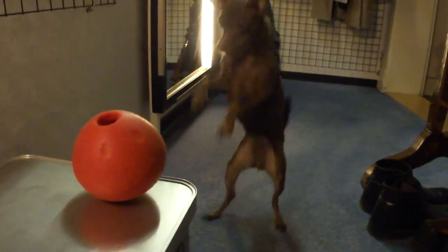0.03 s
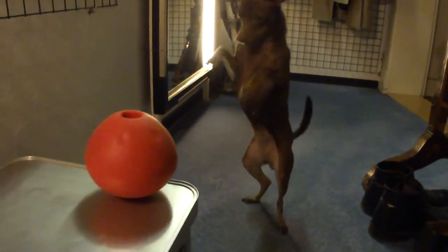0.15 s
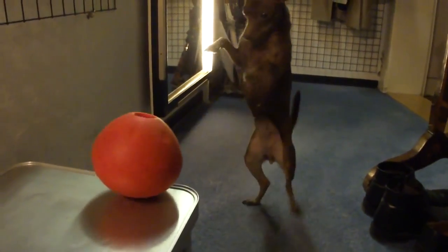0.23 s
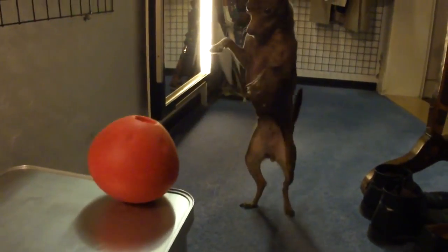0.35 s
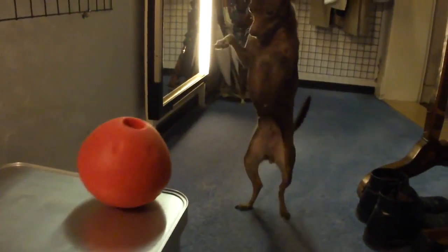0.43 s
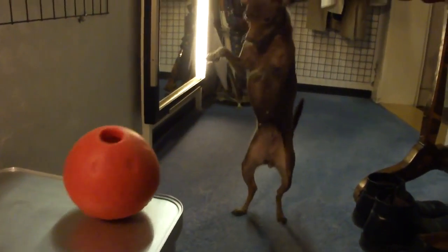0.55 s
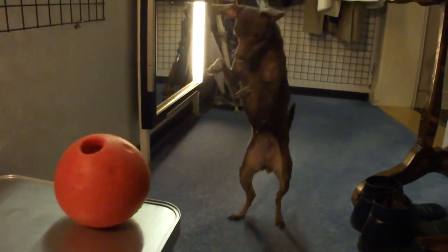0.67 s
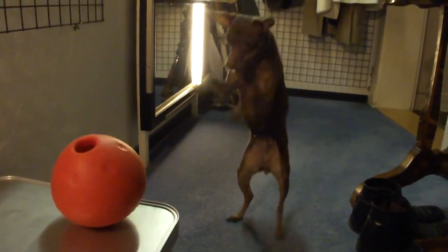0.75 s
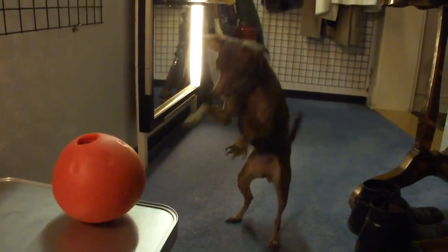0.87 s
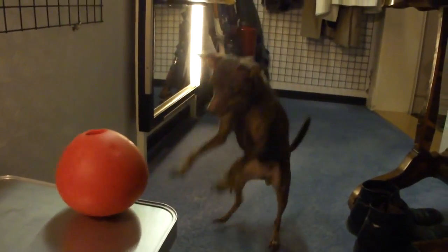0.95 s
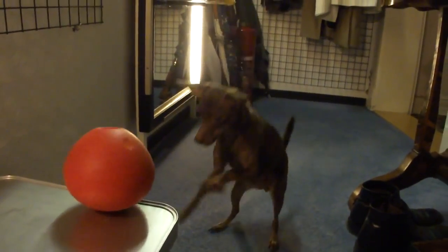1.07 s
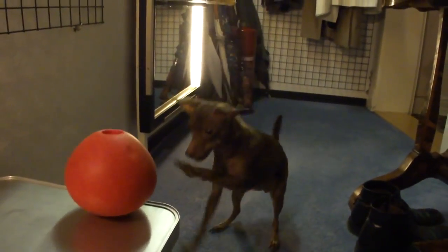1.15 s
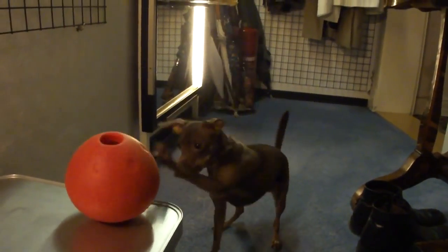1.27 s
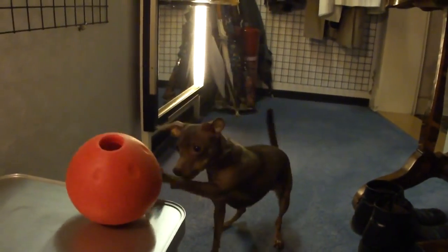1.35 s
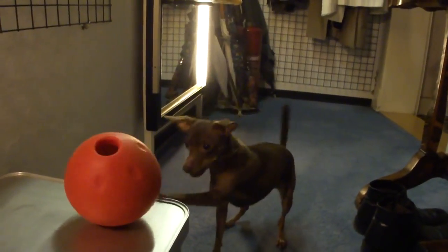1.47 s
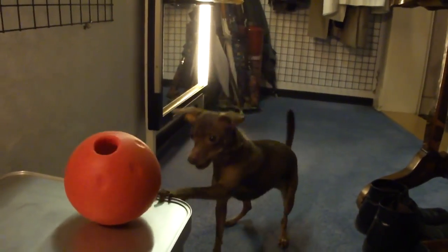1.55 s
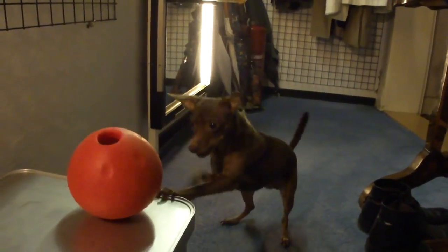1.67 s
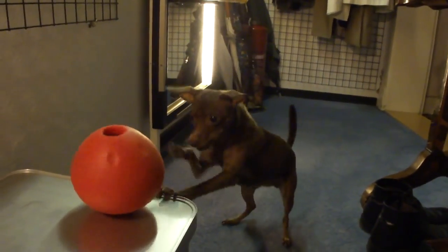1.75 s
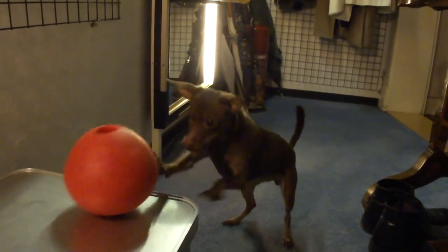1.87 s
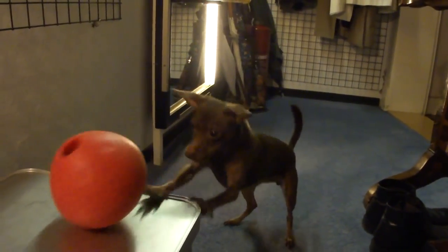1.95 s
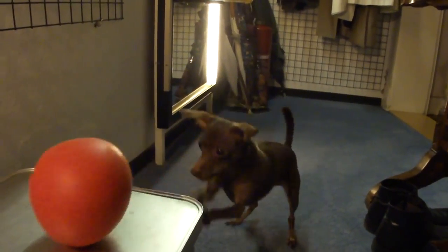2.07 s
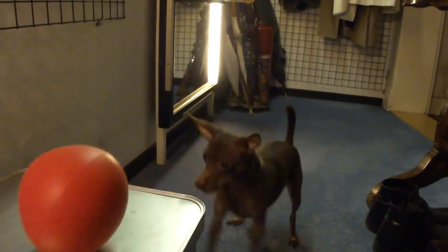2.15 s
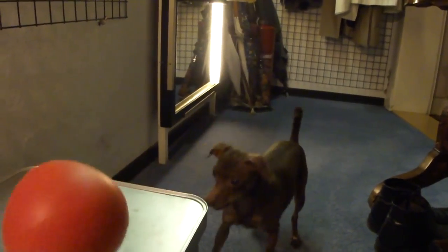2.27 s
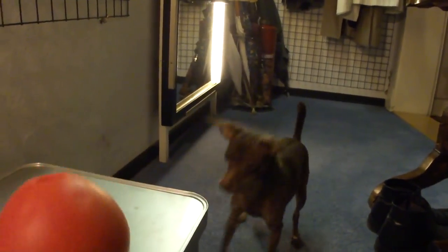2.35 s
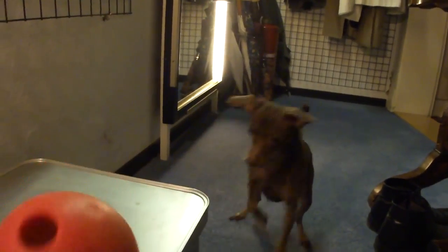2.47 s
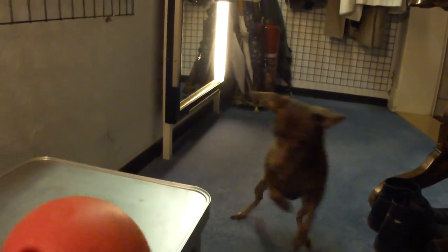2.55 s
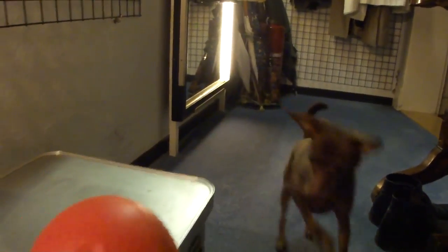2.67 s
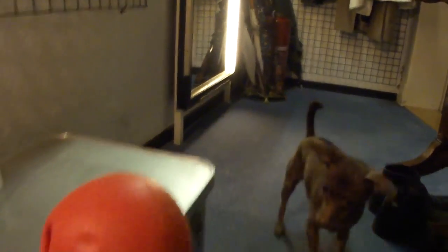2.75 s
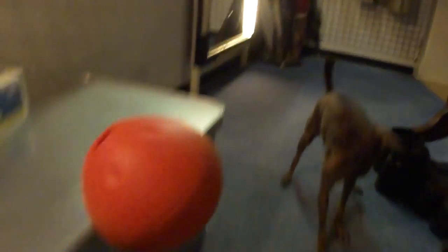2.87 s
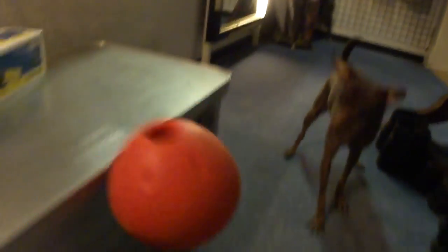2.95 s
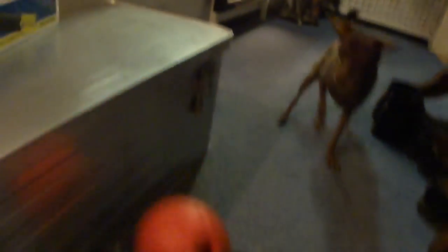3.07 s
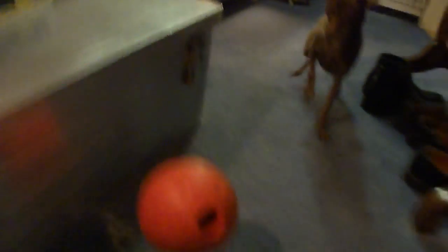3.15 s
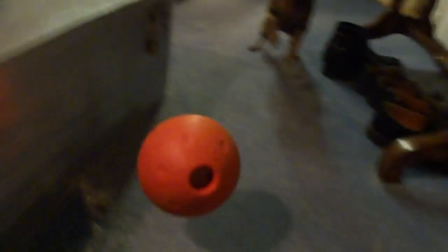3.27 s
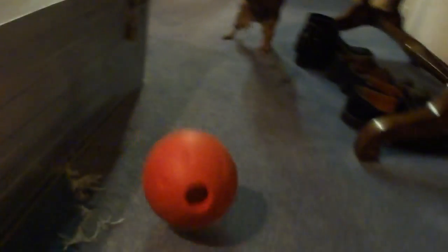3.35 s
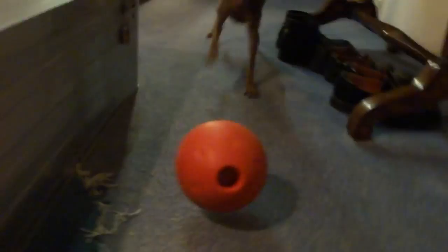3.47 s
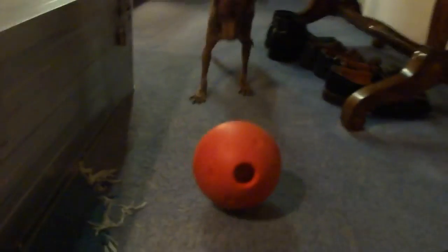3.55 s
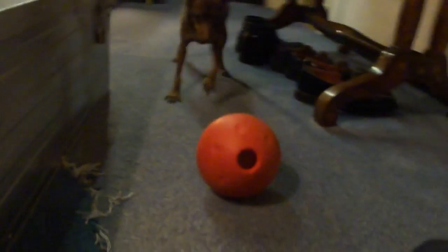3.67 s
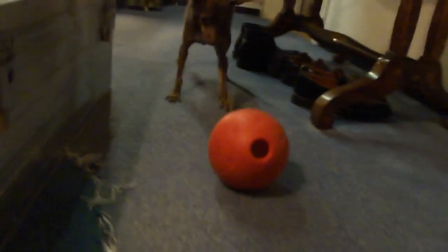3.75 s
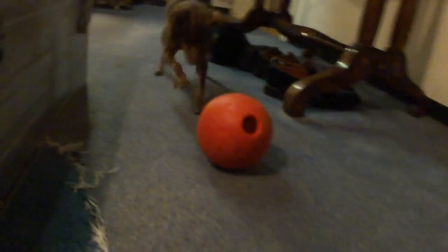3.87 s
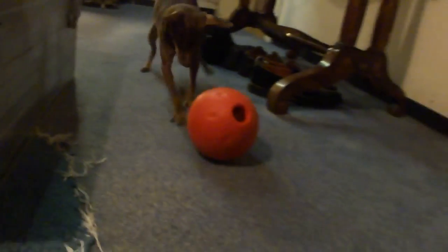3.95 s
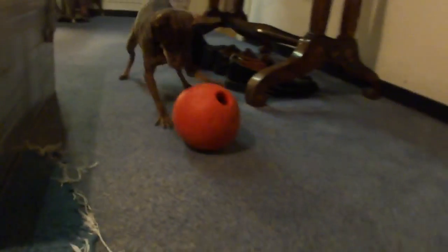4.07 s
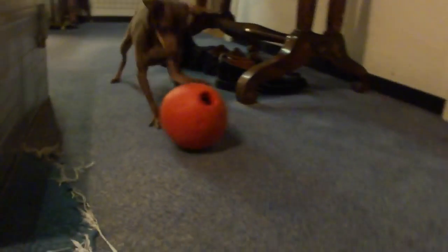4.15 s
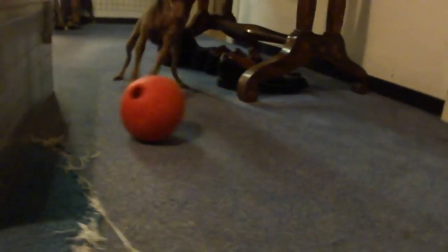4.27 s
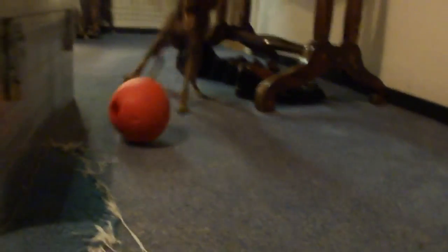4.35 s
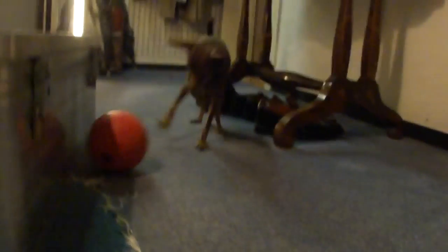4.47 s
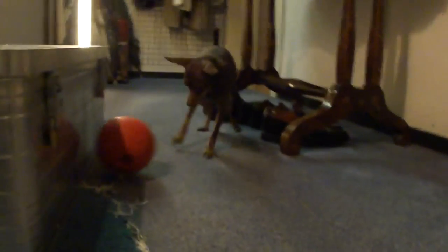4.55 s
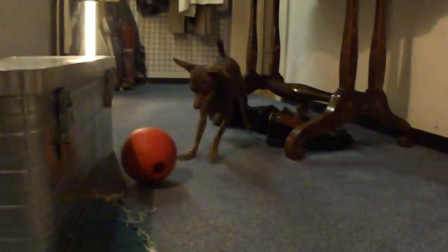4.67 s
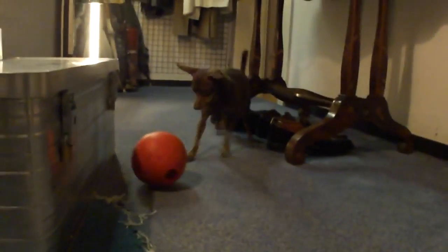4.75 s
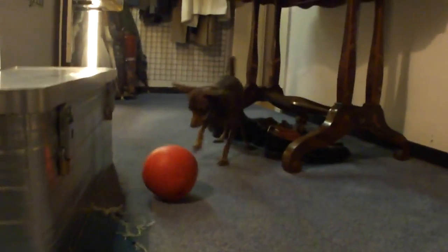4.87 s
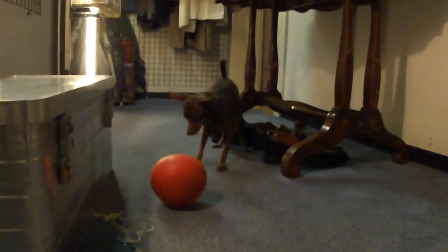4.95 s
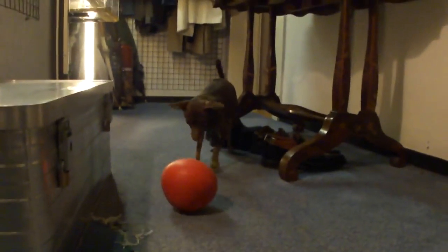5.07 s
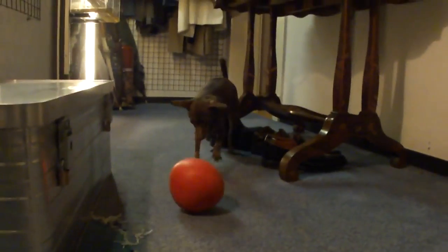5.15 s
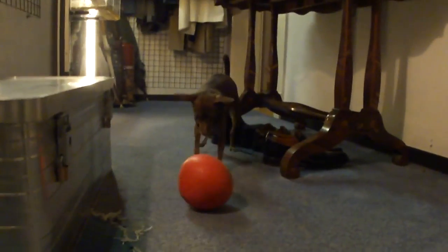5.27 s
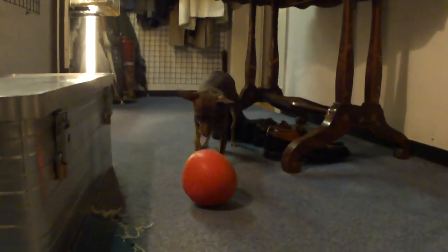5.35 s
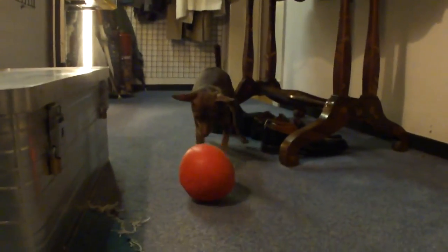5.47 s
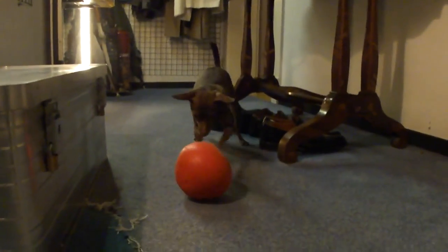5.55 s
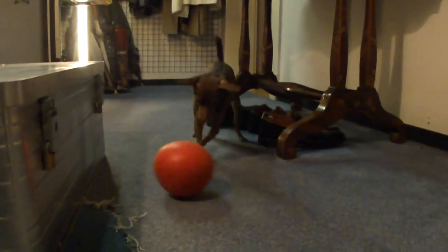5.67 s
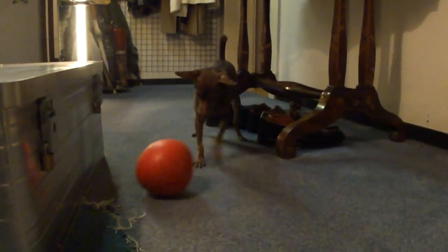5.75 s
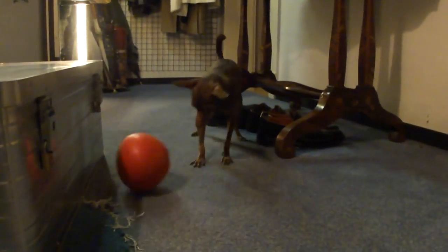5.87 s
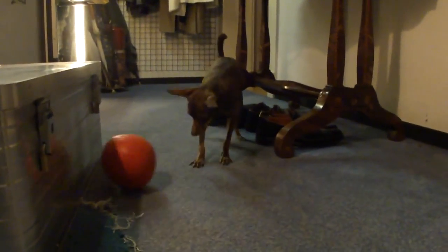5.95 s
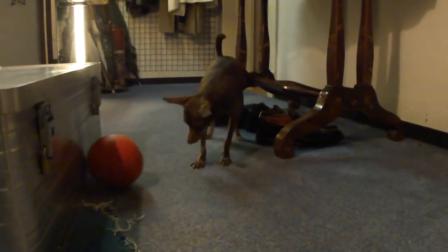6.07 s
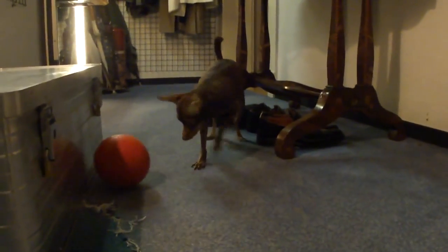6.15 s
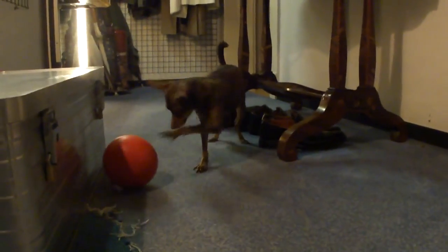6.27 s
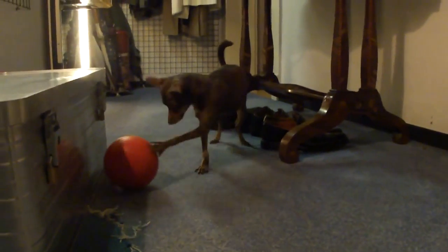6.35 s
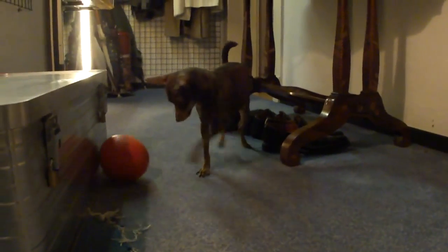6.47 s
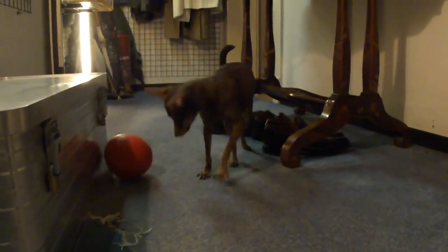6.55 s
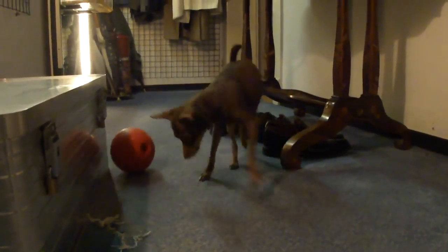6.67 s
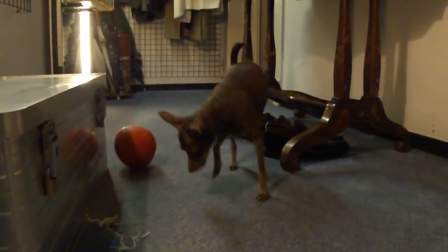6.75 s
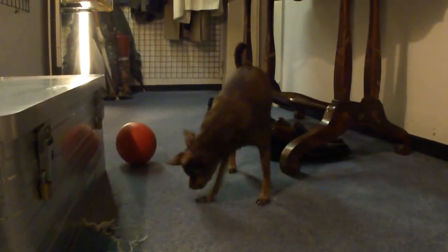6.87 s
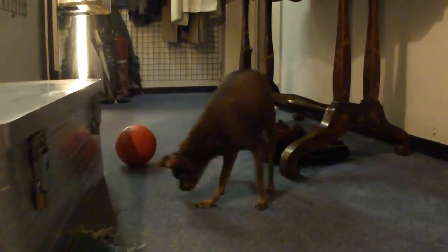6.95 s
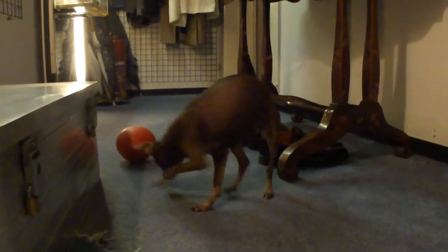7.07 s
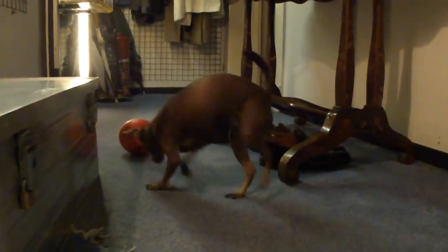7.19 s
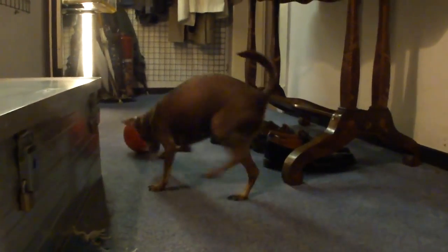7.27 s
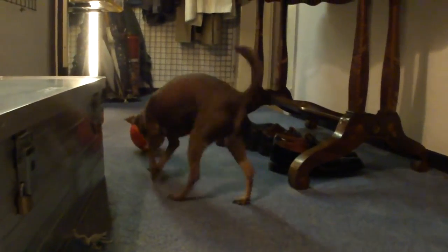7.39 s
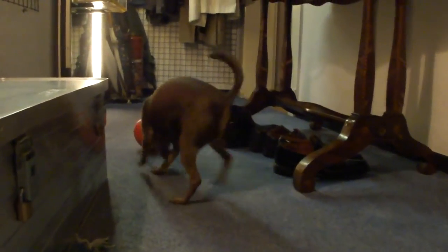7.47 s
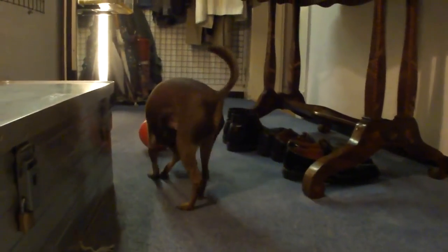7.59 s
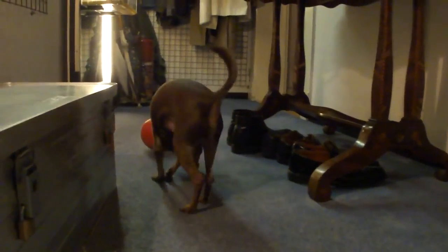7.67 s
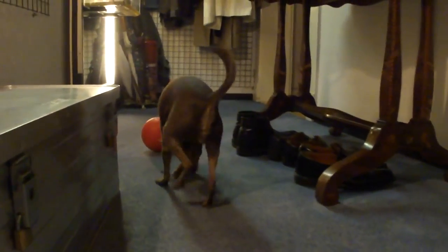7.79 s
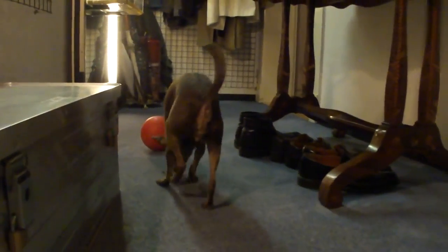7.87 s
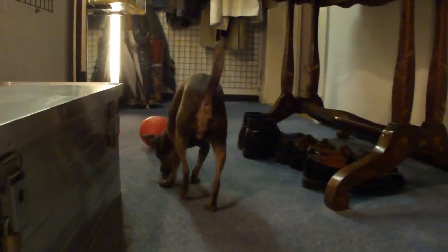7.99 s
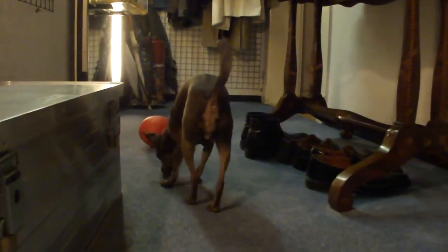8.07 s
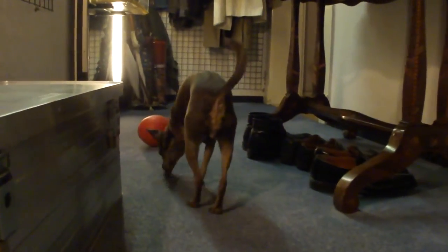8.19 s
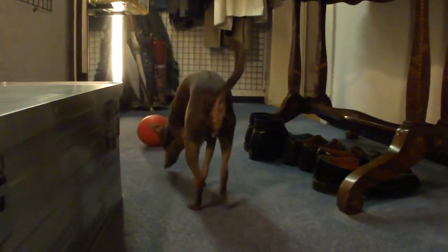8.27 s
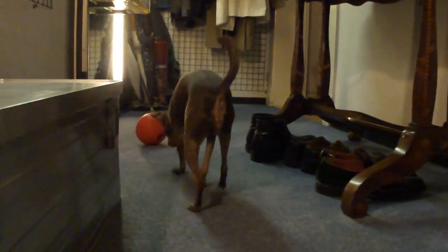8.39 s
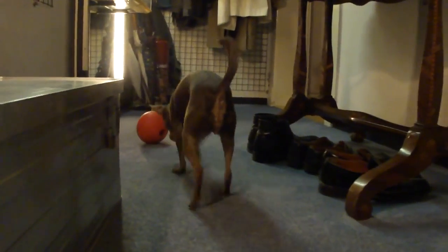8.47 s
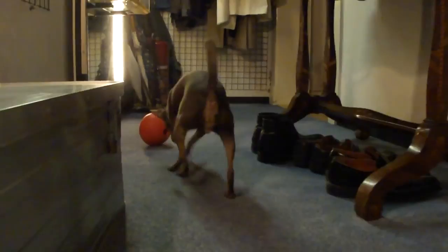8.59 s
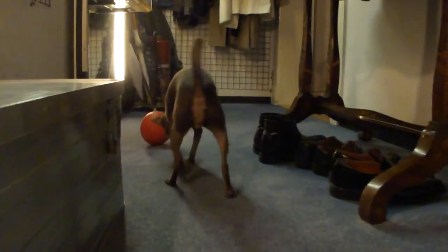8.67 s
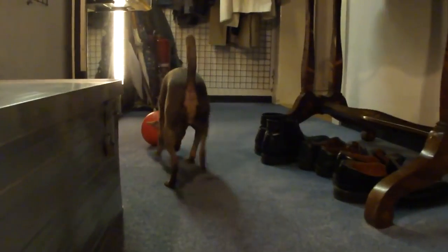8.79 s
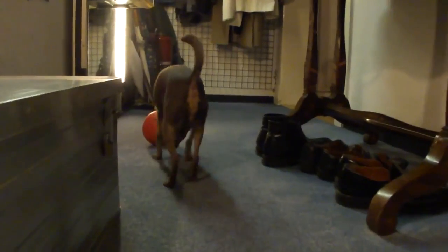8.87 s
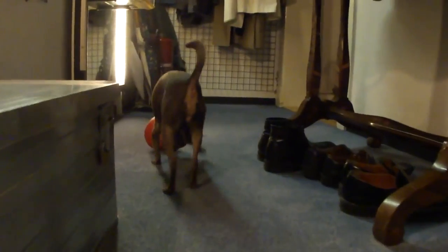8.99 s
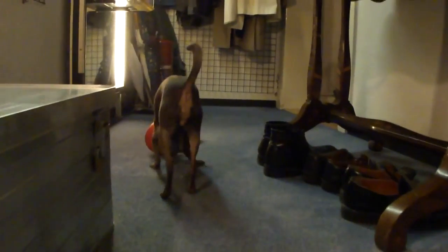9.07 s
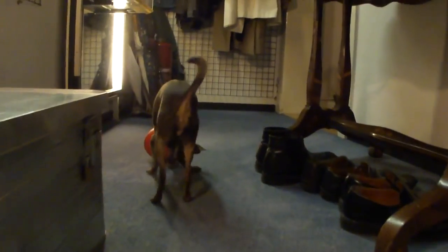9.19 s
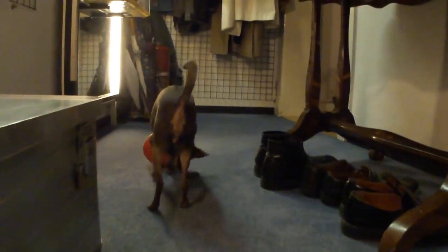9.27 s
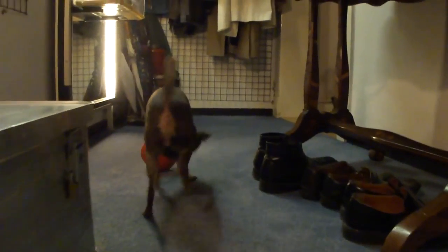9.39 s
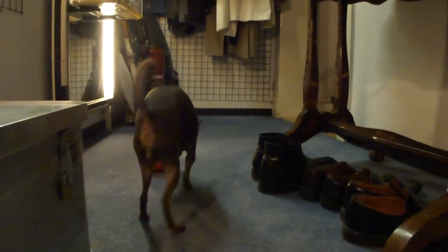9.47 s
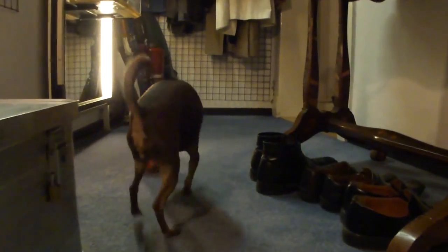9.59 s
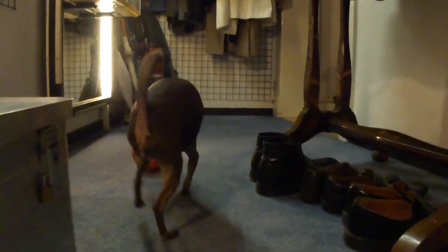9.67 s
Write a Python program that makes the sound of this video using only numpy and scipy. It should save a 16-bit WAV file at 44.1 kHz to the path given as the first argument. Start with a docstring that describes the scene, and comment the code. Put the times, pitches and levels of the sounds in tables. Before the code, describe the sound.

A hard hollow treat ball is pawed off a metal trunk, thuds and rattles onto carpet, then rolls, clicks and bumps around a quiet hall.

```python
"""Small dog chasing a treat ball

A small dog paws a hollow plastic treat ball off a metal trunk and chases it over carpet in a narrow hall.
Hits and jolts make a thud, a knock of the shell and a crack; noise bursts and pings are the treats inside.
Soft pulses are paws, short pings are claws and treats, shaped noise is the carpet, the lid and the quiet hall.
One short muffled woof is a falling tone mixed with hoarse noise."""
import sys
import numpy as np
from scipy import signal
from scipy.fft import rfft, irfft, next_fast_len
from scipy.io import wavfile
from scipy.ndimage import map_coordinates

SR = 44100
rng = np.random.default_rng(int(sys.argv[2]) if len(sys.argv) > 2 else 0)


def write(x):
    x = np.atleast_2d(x).T
    wavfile.write(sys.argv[1], SR, np.round(np.clip(x, -1, 1) * 32767).astype(np.int16))


N = 429093  # length of the scene [samples]
TAIL = SR * 6 // 10  # room for one contact to die away [samples]

# Tone balance of a knock on a hard body: (frequency [Hz], relative level [dB])
BODY = [(100, -75.5), (350, 9.5), (600, 14.5), (800, 12), (1100, 11), (1800, 8), (2600, -8), (5000, -20),
        (12000, -42.5)]
# Tone balance of the bright crack of a contact: (frequency [Hz], relative level [dB])
CRACK = [(500, -19), (2500, 17), (4500, 8), (6500, 14), (9000, 11), (16000, -14.5)]


def amp(db):
    """Turn decibels into a gain."""
    return 10 ** (np.asarray(db) / 20)


def unit(x):
    """Scale to an average (rms) strength of 1."""
    return x / np.sqrt(np.mean(x ** 2) + 1e-20)


def along(points, hz):
    """Read (frequency, value) points at any frequency, on a log axis."""
    f, v = np.transpose(points)
    return np.interp(np.log(hz + 1), np.log(f + 1), v)


def curves(rows):
    """Give one value per sample for each column after the time."""
    s, *cols = np.transpose(rows)
    return [np.interp(np.arange(N) / SR, s, c) for c in cols]


def wobble(rate):
    """Draw a smooth random curve through `rate` random points a second."""
    points = rng.standard_normal(int(N * rate / SR) + 4)
    return map_coordinates(points, [np.arange(N) * rate / SR])


def convolve(x, h):
    """Let every sample of x set off the response h; the result is as long as x."""
    return signal.fftconvolve(np.atleast_2d(x), np.atleast_2d(h), axes=1)[:, :x.shape[-1]]


def causal(spectrum, size=4096):
    """Build the most compact response (minimum phase) with this (Hz, dB) spectrum."""
    gain = amp(along(spectrum, np.fft.rfftfreq(size, 1 / SR)))
    cepstrum = irfft(np.log(gain))
    # folding the second half onto the first puts all the sound after time zero
    cepstrum[1:size // 2] *= 2
    cepstrum[size // 2 + 1:] = 0
    return irfft(np.exp(rfft(cepstrum)))


def pulse(spectrum):
    """Make a contact pulse with this tone balance and the energy of 4 ms at rms 1."""
    h = causal(spectrum)
    return h / np.linalg.norm(h) * np.sqrt(SR * .004)


def diffuse(size, spectrum=((100, 0), (1000, 0))):
    """Make stereo noise from all sides: alike in the bass, unrelated in the treble."""
    # (frequency [Hz], left-right likeness [0 to 1])
    likeness = [(150, .993), (350, .98), (700, .95), (1400, .85), (2400, .74), (5000, .45), (12000, .05)]
    m = next_fast_len(size)
    hz = np.fft.rfftfreq(m, 1 / SR)
    turn = np.arccos(np.clip(along(likeness, hz), -1, 1)) / 2
    noise = rfft(rng.standard_normal((2, m))) * amp(along(spectrum, hz))
    mid, side = irfft(noise * [np.cos(turn), np.sin(turn)], m)[:, :size]
    return unit(np.array([mid + side, mid - side]))


def hall(x, wet_db, build=0.003, lag=.000018):
    """Place a sound in the hall: it reaches the two ports a little apart, then a fresh random echo follows."""
    # (frequency [Hz], time to fade by 60 dB [s])
    fade_times = [(100, 0.27), (400, 0.36), (1000, 0.29), (2500, 0.36), (7000, 0.25), (15000, 0.16)]
    hz, t, z = signal.stft(diffuse(TAIL), SR, nperseg=256)
    fading = z * amp(-60 * t / along(fade_times, hz)[:, None])
    tail = signal.istft(fading, SR, nperseg=256)[1]
    # the echo needs a few milliseconds to build up
    tail *= 1 - np.exp(-(np.arange(tail.shape[1]) / SR / build) ** 2)
    shift = rng.choice([-1, 1]) * lag * SR / 2
    direct = np.sinc(np.arange(-8, 9) + [[shift], [-shift]])
    return convolve(x, direct) + amp(wet_db) * convolve(x, tail / np.linalg.norm(tail[0]))


def add(track, s, sound):
    """Mix a sound into the track at time s."""
    start = max(round(s * SR), 0)
    track[:, start:start + sound.shape[1]] += sound[:, :N - start]


def ping(hz, swell):
    """Ring a heavily damped resonance whose envelope peaks after `swell` seconds."""
    t = np.arange(TAIL) / SR
    return t / swell * np.exp(1 - t / swell) * np.sin(2 * np.pi * hz * t)


def ringing(modes, attack=0.0012):
    """Ring a set of quickly damped tones (modes), at slightly random strengths, with total energy 1."""
    longest_ring = .28  # longest time any mode takes to fade by 60 dB [s]
    t = np.arange(TAIL) / SR
    ring = np.zeros(TAIL)
    for hz, db, t60 in modes:
        fading_db = db + rng.normal(0, 1.2) - 60 * t / min(t60, longest_ring)
        ring += amp(fading_db) * np.sin(2 * np.pi * hz * t)
    ring = ring * (1 - np.exp(-(t / attack) ** 2))
    return ring / np.linalg.norm(ring)


def rattle(spread, uneven_db, count=48):
    """Let treats thrown up by a blow land one after another: impulses of total energy 1."""
    when = rng.rayleigh(1, count) * spread * SR
    sizes = amp(uneven_db * rng.standard_normal(count)) * rng.choice([-1, 1], count)
    return np.bincount(np.minimum(when, TAIL - 1).astype(int), sizes / np.linalg.norm(sizes), TAIL)


def crunch(hits, swell):
    """Turn each contact into its own tiny burst of noise, with the energy of its impulse."""
    t = np.arange(TAIL) / SR
    power = (t * np.exp(-t / swell)) ** 2
    return np.sqrt(np.abs(convolve(hits ** 2, power / power.sum()))) * rng.standard_normal(TAIL)


def strokes(rows, attack, release, fade_db):
    """Gain of (s, length, dB) moves: each swells, loses fade_db a second (gains if negative), then dies away."""
    gain = np.zeros(N)
    for s, length, db in rows:
        start = max(round(s * SR), 0)
        t = np.arange(min(SR, N - start)) / SR
        swelling = 1 - np.exp(-t / attack)
        dying = np.exp(-np.maximum(t - length, 0) / release)
        gain[start:start + len(t)] += amp(db - fade_db * t) * swelling * dying
    return gain


def ball(rows, thud_db, shell_db, dent_db, crack_db, ring_db, treats_db, wet_db, cycles, drag_db, tilt_db, spread):
    """Each contact dents the shell, sets it ringing and shakes the treats inside."""
    # ring of the ball's shell and the trunk:
    # (frequency [Hz], relative level [dB], fade time before the limit in ringing() [s])
    shell_modes = [(216, 8, 0.28), (318, -53.5, 0.098), (398, -25.5, 0.038), (528, -10.5, 0.75),
                   (611, -29.5, 0.79), (803, -6, 0.44), (957, 4.5, 0.53), (1082, 17, 0.09), (1314, 6, 0.62),
                   (1516, 0, 0.37), (1703, -26, 0.5), (1876, -15.5, .25)]
    # tone balance of the low thud: (frequency [Hz], relative level [dB])
    thud_tone = [(30, -42), (70, -33), (130, -22), (205, -1), (300, 1), (480, -6), (800, -22), (2500, -60)]
    out = np.zeros((2, N))
    thud, body = pulse(thud_tone), pulse(BODY)
    # tilt_db brightens the crack for every octave upward
    crack = pulse([(f, level + tilt_db * np.log2(f / CRACK[3][0])) for f, level in CRACK])
    for s, db, low_db, high_db, hz, hollow_db, rattle_db in rows:
        # the shell drags for a few milliseconds after first touching
        blow = signal.unit_impulse(TAIL) + amp(drag_db) * rattle(.003, uneven_db=5, count=8)
        force = blow + amp(rattle_db) * rattle(spread, uneven_db=5.5)
        knock = convolve(force, amp(low_db + thud_db) * thud + amp(db + shell_db) * body)
        # the dent springs back in a few cycles, at its own pitch
        dent = convolve(force, ping(hz, cycles / hz))
        knock = knock + amp(db + hollow_db + dent_db) * dent
        knock = knock + amp(ring_db) * convolve(knock, ringing(shell_modes))
        # the blow and the hard, dry treats crackle brightly
        treats = amp(rattle_db + treats_db) * rattle(spread, uneven_db=7.5)
        chatter = crunch(0.72 * blow + treats, swell=0.0013)
        add(out, s, hall(knock + amp(high_db + crack_db) * convolve(chatter, crack), wet_db))
    return out


def nudges(rattle_db=-5):
    """List jolts as ball contacts: a lower dent pitch brings more thud, and all shake the treats alike."""
    # a paw or muzzle jolts the ball; levels before the trims in ball():
    # (time [s], strength [dB], crack level [dB], dent pitch [Hz])
    jolts = [(0.002, -24, -29.5, 464), (1.417, -32, -68, 370), (1.52, -16, -30, 463),
             (1.542, -23, -36.5, 500), (1.907, -17.5, -45, 502), (1.997, -17.5, -46, 625),
             (2.02, -16.5, -32, 790), (2.04, -15.5, -22.5, 486), (2.053, -13.5, -19.5, 487),
             (2.136, -30, -26.5, 670), (2.147, -9, -22.5, 730), (2.16, -19, -26, 605),
             (2.19, -35, -30.5, 640), (2.275, -29, -61, 486), (2.833, -16.5, -44.5, 760),
             (2.883, -25.5, -55, 1000), (4.705, -11.5, -27.5, 450), (4.805, -16.5, -36.5, 520),
             (4.891, -21, -51, 460), (5.458, -19, -57, 890), (5.653, -26.5, -69, 470),
             (5.748, -21.5, -43.5, 567), (6.255, -13, -38, 520), (6.285, -17.5, -39.5, 520),
             (6.404, -18.5, -76, 390), (6.799, -22.5, -55, 575), (7.324, -28.5, -56.5, 930),
             (7.403, -39, -71, 380), (7.895, -31, -71, 920), (8.501, -20, -29.5, 1160),
             (8.579, -27.5, -66.5, 1010), (9.488, -34.5, -53, 420), (9.66, -34.5, -59, 310)]
    thud_hz, thud_db_per_octave = 480, -20.5
    rows = []
    for s, db, crack_db, hz in jolts:
        low_db = db + thud_db_per_octave * np.log2(hz / thud_hz)
        rows.append((s, db, low_db, crack_db, hz, 0, rattle_db))
    return rows


def trunk(level_db=-4, wet_db=-6):
    """The trunk's wide metal wall booms briefly when the ball runs into it."""
    # the ball runs into the wall: (time [s], peak level before level_db and echo [dB])
    booms = [(4.602, -15.5), (6.155, -20), (6.576, -20.5)]
    # (frequency [Hz], relative level [dB], fade time before the limit in ringing() [s])
    wall_modes = [(66, 2, 0.38), (91, 2, 0.226), (133, 12, 0.34), (182.4, 4.5, 0.51)]
    out = np.zeros((2, N))
    for s, db in booms:
        boom = ringing(wall_modes, attack=0.0067)
        add(out, s, hall(amp(db + level_db) * boom / np.abs(boom).max(), wet_db))
    return out


def ticks(tick_db=-4, snap_db=-6.0, swell=0.00051, grit_db=-27, rebound_db=-7, wet_db=-7):
    """Claws and single treats give a short ping, a little grit and a bright snap, and rebound at once."""
    # (time [s], ping level before tick_db [dB], pitch [Hz], snap level before snap_db [dB])
    contacts = [(1.4237, -23.5, 1510, -96), (1.9075, -17, 1710, -69), (1.931, -36, 1770, -29.5),
                (2.0381, -12.5, 1580, -15), (2.3165, -18, 1930, -50), (2.373, -21, 1710, -71),
                (2.4067, -33, 1600, -66), (2.4347, -31.5, 1840, -69), (2.4667, -20.5, 2150, -52),
                (2.543, -17, 1890, -67), (2.6251, -11, 1810, -65), (2.6646, -20.5, 1990, -51.5),
                (2.7102, -14.5, 1765, -33), (3.326, -9, 1830, -42), (3.4767, -6.5, 1640, -17),
                (3.5203, -13.5, 2120, -23.5), (3.6449, -13, 1880, -28), (3.7867, -19, 1970, -46),
                (4.1038, -7, 990, -32), (4.104, -15.5, 1970, -36), (4.1688, -8, 1870, -37.5),
                (5.305, -24.5, 1550, -57), (5.442, -25, 1650, -68), (5.458, -16, 1750, -43.5),
                (5.6515, -17, 1980, -54), (6.041, -25, 1940, -69), (6.4033, -23, 1800, -60),
                (6.8414, -22, 2400, -54), (7.3206, -21, 1870, -43), (7.4031, -28.5, 1970, -67),
                (7.4724, -29.5, 2200, -66), (7.7605, -24.5, 1970, -72), (7.8956, -20.5, 1630, -50),
                (8.4818, -17, 1780, -41)]
    out, crack, body = np.zeros((2, N)), pulse(CRACK), pulse(BODY)
    for s, db, hz, bright_db in contacts:
        rebounds = rattle(spread=0.00204, uneven_db=3.5, count=2)
        force = signal.unit_impulse(TAIL) + amp(rebound_db) * rebounds
        bright = amp(bright_db + snap_db) * crack + amp(db + grit_db) * body
        snap = convolve(crunch(force, swell=0.00066), bright)
        tick = amp(db + tick_db) * convolve(force, ping(hz, swell))
        add(out, s, hall(tick + snap, wet_db))
    return out


def tumbles(level_db=-4, swell=0.0023, again_db=-10, grit_db=-17, wet_db=-6):
    """Treats roll over inside the slowly turning ball, tap its wall and sound its hollow."""
    # (time [s], tap level before level_db [dB], pitch [Hz])
    taps = [(0.22, -33, 845), (0.777, -38, 670), (4.959, -32, 1080), (5.026, -27, 1050),
            (5.129, -27.5, 1030), (5.257, -27, 885), (5.322, -24.5, 970), (5.378, -22.5, 1016),
            (7.273, -31.5, 1020), (7.374, -33, 1060), (7.839, -27.5, 1010), (8.388, -30.5, 1066)]
    out, body = np.zeros((2, N)), pulse(BODY)
    for s, db, hz in taps:
        force = signal.unit_impulse(TAIL) + amp(again_db) * rattle(spread=0.0056, uneven_db=1, count=6)
        tap = convolve(force, ping(hz, swell)) + amp(grit_db) * convolve(force, body)
        add(out, s, hall(amp(db + level_db) * tap, wet_db))
    return out


def strays(rolling, hz, spread, over_db, swell, snap_db, wet_db, count, uneven_db=3):
    """Loose treats make faint contacts at random, harder and more often the faster the ball rolls."""
    out, crack = np.zeros((1, N)), pulse(CRACK)
    turned = np.cumsum(np.sqrt(rolling))  # how far the ball has rolled so far
    for share, size, pitch in zip(rng.random(count), *rng.standard_normal((2, count))):
        at = np.searchsorted(turned, share * turned[-1])
        tick = ping(hz * np.exp(spread * pitch), swell)[:len(crack)] + amp(snap_db) * crack
        add(out, at / SR, rolling[at] * amp(over_db + uneven_db * size) * tick[None])
    return hall(out, wet_db)


def paws(thud_db=-5, slap_db=-16, wet_db=2):
    """Soft pads thump the carpeted floor: a low pulse with a little knock."""
    # paws land: (time [s], level before thud_db and slap_db [dB])
    landings = [(0.334, -32), (0.446, -34), (1.117, -31), (1.217, -32), (2.276, -36), (2.359, -30),
                (2.743, -33.5), (3.704, -36), (4.171, -31), (5.655, -32), (7.167, -41.5), (9.543, -50)]
    # tone balance of the soft pad: (frequency [Hz], relative level [dB])
    pad_tone = [(30, -25), (70, 3.5), (140, 12.5), (300, 11.5), (550, 10), (1200, -28.5), (4000, -79)]
    out = np.zeros((2, N))
    step = convolve(signal.unit_impulse(TAIL), amp(thud_db) * pulse(pad_tone) + amp(slap_db) * pulse(BODY))
    for s, db in landings:
        add(out, s, hall(amp(db) * step, wet_db))
    return out


def woof(level_db=-1, jitter=0.022, shimmer_db=0.5, rasp=.7, wet_db=-7):
    """A short, rough, falling woof through a nearly closed muzzle: six harmonics and hoarse noise."""
    # (time [s], pitch before jitter [Hz], level before level_db and shimmer [dB])
    glide = [(9.380, 500, -32.5), (9.388, 492, -38.5), (9.406, 485, -22), (9.418, 396.3, -30),
             (9.440, 395, -28.5), (9.455, 374, -41.5), (9.468, 375, -65)]
    # how the throat passes sound: (frequency [Hz], level [dB])
    throat = [(400, 0), (560, -7), (810, -8.5), (1020, -29.5), (1250, -13.5), (1650, -28.5), (2100, -39.5),
              (3000, -47.5)]
    hz, db = curves(glide)
    phase = 2 * np.pi * np.cumsum(hz * (1 + jitter * wobble(rate=300))) / SR
    tone = sum(amp(along(throat, k * hz)) * np.sin(k * phase) for k in range(1, 7))
    # turbulence pulses once a cycle and passes through the same throat, with less bass
    breath = rng.standard_normal(N) * (1 + np.cos(phase))
    hoarse = convolve(breath, causal([(150, -67), (330, -6.5)] + list(throat)))
    t = np.arange(N) / SR
    sounding = (t > glide[0][0]) & (t < glide[-1][0])
    voice = unit(tone) + rasp * unit(hoarse)
    loudness = amp(db + level_db + shimmer_db * wobble(rate=390))
    return hall(voice * sounding * loudness, wet_db)


def lid(level_db=1, grain_db=2.0):
    """The rocking ball and scraping paws excite the lid's resonances: noise with a grainy level."""
    # ball and paws scrape the metal lid: (time [s], length [s], level before level_db and grain [dB])
    scrapes = [(1.105, 0.17, -43.5), (1.33, 0.039, -53), (1.52, 0.25, -44), (1.858, 0.056, -56.5)]
    # resonances of the lid: (frequency [Hz], relative level [dB])
    lid_tone = [(200, -23), (450, -11), (640, 13), (900, 2), (1250, 0.5), (1450, 9.5), (1750, -20),
                (2000, 8.5), (2230, 3.5), (2500, -8.5), (4000, -18.5), (9000, -32)]
    pressure = strokes(scrapes, attack=0.0075, release=0.028, fade_db=22)
    return pressure * amp(level_db + grain_db * wobble(rate=180)) * diffuse(N, lid_tone)


def carpet(rolling, rub_db=-3.0, hiss_db=-25.0, scuff_db=-1, grain_db=2.7):
    """The rolling ball rubs the pile unevenly; its hiss follows the rub, and scuffing paws and soft rustles add
    their own."""
    # paws brush the pile, and soft rustles swell near the end: (time [s], length [s], level before scuff_db and
    # grain [dB])
    scuffs = [(3.08, 0.12, -60), (3.33, 0.1, -54), (3.81, 0.14, -57), (5.76, 0.063, -59),
              (6.74, 0.263, -62.5), (9.2, 0.15, -72), (9.38, 0.12, -63), (9.55, 0.11, -57.5)]
    # tone balance of the rub: (frequency [Hz], relative level [dB])
    rub_tone = [(40, -21.5), (130, -8), (350, 10), (700, 9.5), (1100, 8), (2200, 0), (4000, -10.5),
                (9000, -33.5)]
    # tone balance of the hiss: (frequency [Hz], relative level [dB])
    hiss_tone = [(1500, -14), (4000, 13), (6500, 15), (10000, 12.5), (16000, -89)]
    grain = grain_db * wobble(rate=45)
    brushing = strokes(scuffs, attack=0.017, release=0.034, fade_db=-9)
    hiss = np.hypot(amp(hiss_db) * rolling, amp(scuff_db) * brushing)
    rub = rolling * amp(rub_db + grain)
    return rub * diffuse(N, rub_tone) + hiss * amp(grain / 2) * diffuse(N, hiss_tone)


def hush(level_db=-56, waver_db=2.4):
    """The hall's faint, slightly wavering background is shaped noise."""
    # tone balance of the quiet hall: (frequency [Hz], relative level [dB])
    hush_tone = [(50, -20), (120, -10.5), (220, -5.5), (400, -2), (1000, -5), (2000, -8.5), (3200, -24),
                 (4500, -25), (8000, -20), (10500, -27.5), (16000, -52)]
    return amp(level_db + waver_db * wobble(rate=12)) * diffuse(N, hush_tone)


def scene():
    """Mix all sources, with the left side slightly louder than the right."""
    # the ball hits floor or trunk; levels before the trims below:
    # (time [s], shell level [dB], thud level [dB], crack level [dB], dent pitch [Hz],
    #  dent level over the shell [dB], rattle level over the blow [dB])
    hits = [(3.194, 2, -6, -17, 648, -0.5, 2.5), (3.469, -2, -4.5, -23, 288, -4.5, -7.5),
            (3.617, -15, -14, -21, 327, -3, -6), (4.603, -2, -12.5, -16.5, 400, -6.5, 8),
            (6.154, -4.5, -14, -22.5, 453, -5.5, 5.5), (6.575, -8, -15.5, -23.5, 420, -3, 7)]
    # the ball is pushed and rolls: (time [s], length [s], starting level before later gains [dB])
    rolls = [(0.0, 0.11, -49.5), (0.75, 0.2, -58), (2.22, 0.2, -45), (2.68, 0.26, -45), (3.06, 0.15, -46),
             (3.28, 0.2, -40.5), (3.62, 0.44, -36.5), (4.15, 0.27, -34), (4.72, 0.14, -39),
             (5.0, 0.53, -46), (6.0, 0.14, -47.5), (6.3, 0.26, -47.5), (6.71, 0.27, -42), (7.33, 0.18, -44),
             (7.78, 0.27, -44.5), (8.28, 0.38, -52.5), (8.82, 0.3, -51), (9.45, 0.28, -46)]
    blows = ball(hits, thud_db=-11.0, shell_db=-11.0, dent_db=-4, crack_db=-12.0, ring_db=-23.5, treats_db=6,
                 wet_db=-6.5, cycles=0.94, drag_db=-1.5, tilt_db=1.1, spread=.022)
    jolts = ball(nudges(), thud_db=-23.5, shell_db=-16.0, dent_db=-11.5, crack_db=-6.0, ring_db=-27, treats_db=-2,
                 wet_db=-3.0, cycles=0.71, drag_db=3.5, tilt_db=4.5, spread=.014)
    # a roll fades by 16 dB a second as the ball slows
    rolling = strokes(rolls, attack=0.022, release=0.07, fade_db=16)
    clicking = strays(rolling, hz=1900, spread=0.11, over_db=7.5, swell=.0005, snap_db=-29, wet_db=-2, count=110)
    turning = strays(rolling, hz=1008, spread=0.021, over_db=-0.5, swell=0.0018, snap_db=-44, wet_db=-2, count=100)
    treats = ticks() + clicking + tumbles() + turning
    dog = paws() + woof()
    mix = blows + jolts + trunk() + treats + dog + lid() + carpet(rolling) + hush()
    return mix * amp([[.25], [-.25]])


def record(dry):
    """The microphone colours the sound; peaks beyond full scale clip and the top is cut off."""
    # microphone colour: (frequency [Hz], level [dB])
    mic_colour = [(50, -16), (150, -1.5), (2350, 1.5), (2700, -3), (2980, -18), (3350, -4), (3750, -7),
                  (4070, -16), (4550, -3.5), (5020, -11), (5800, 3.5), (10800, 0.5), (12200, -20.5),
                  (13600, -9), (15200, 7.5)]
    top_hz = 16400  # nothing passes from here up
    clipped = np.clip(convolve(dry, causal(mic_colour)), -1, 1)
    m = next_fast_len(N + SR // 2)
    passed = np.fft.rfftfreq(m, 1 / SR) < top_hz
    return irfft(rfft(clipped, m) * passed, m)[:, :N]


dry = scene()
out = record(dry)
write(out)
```